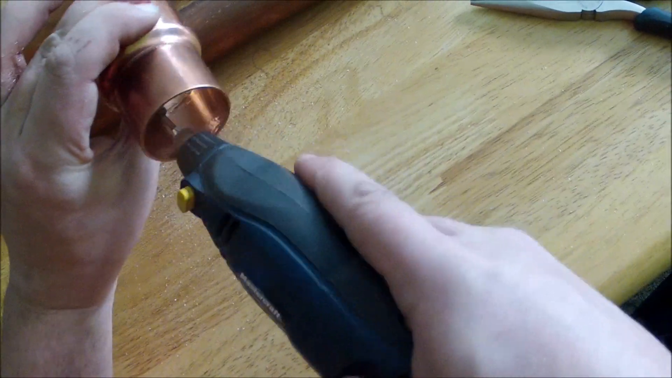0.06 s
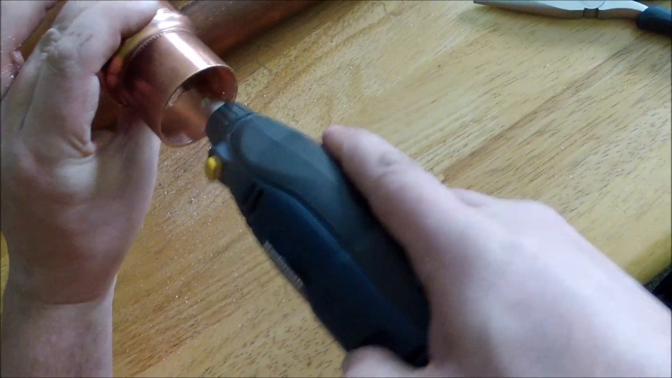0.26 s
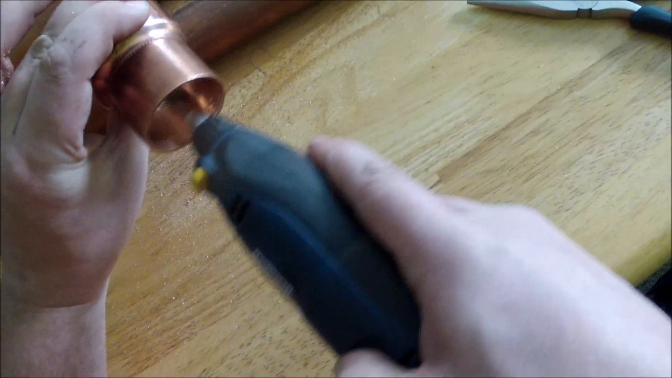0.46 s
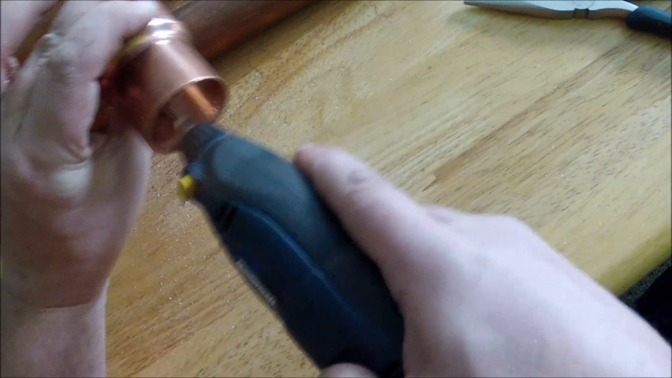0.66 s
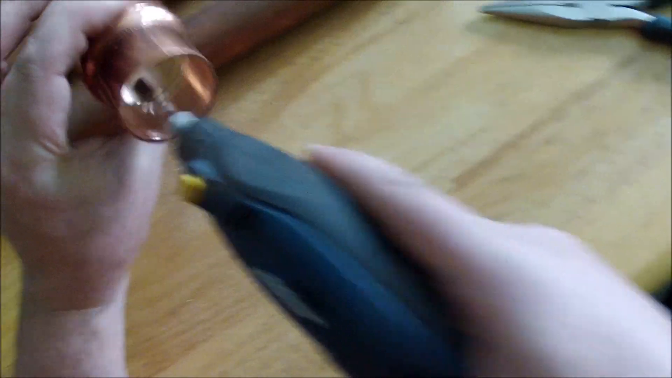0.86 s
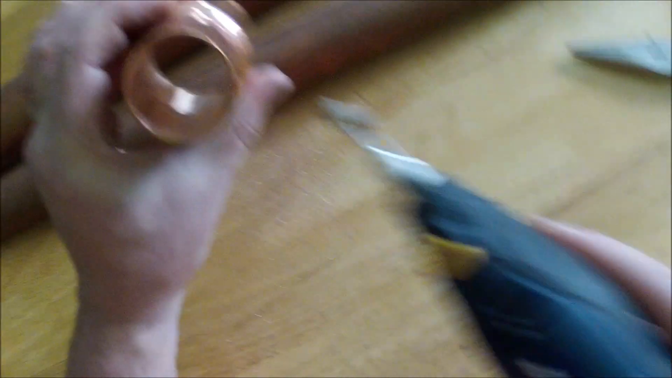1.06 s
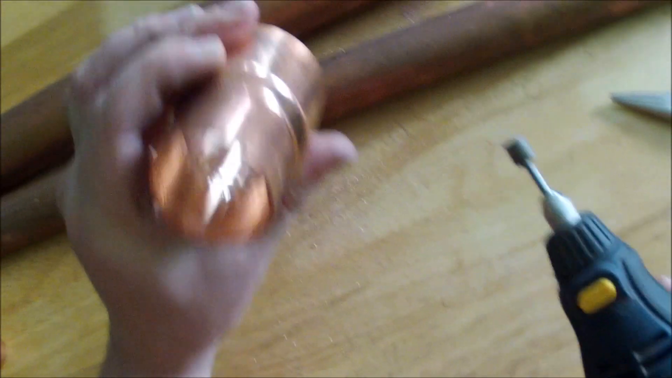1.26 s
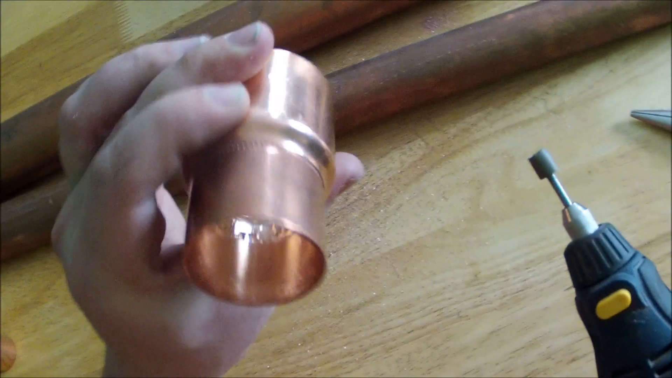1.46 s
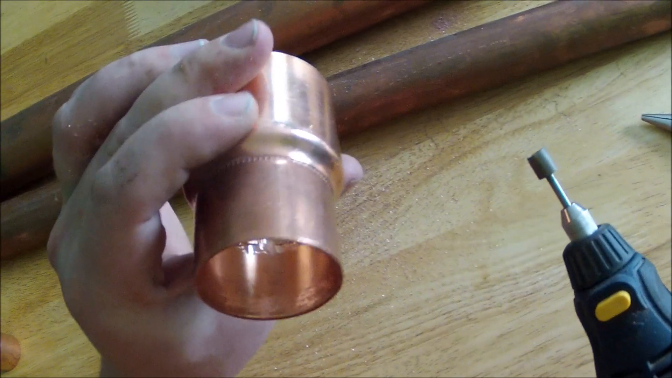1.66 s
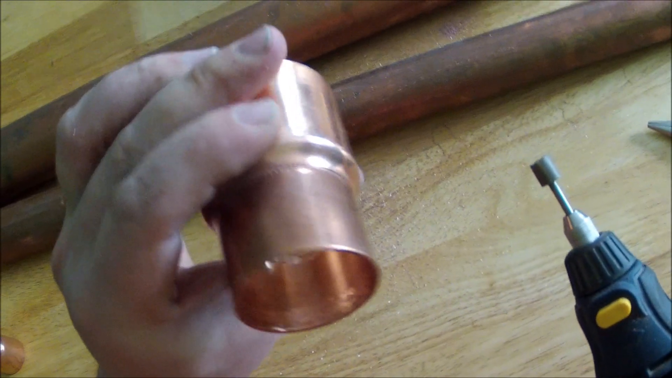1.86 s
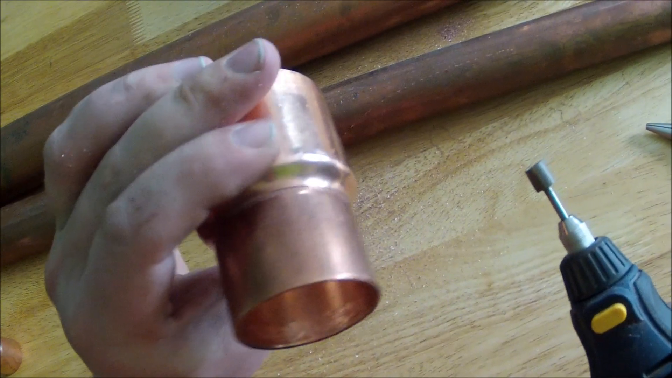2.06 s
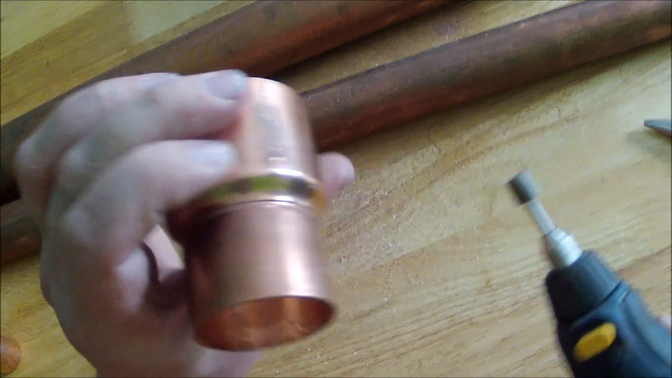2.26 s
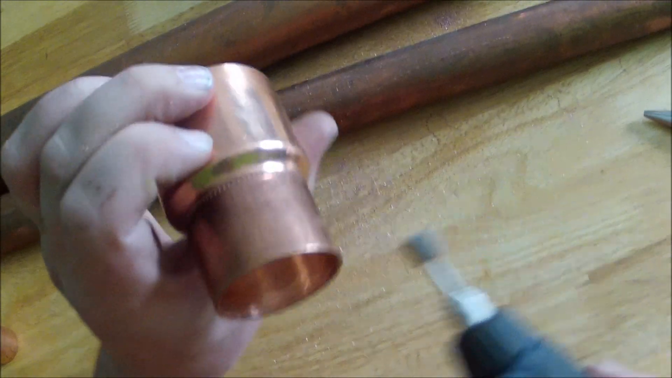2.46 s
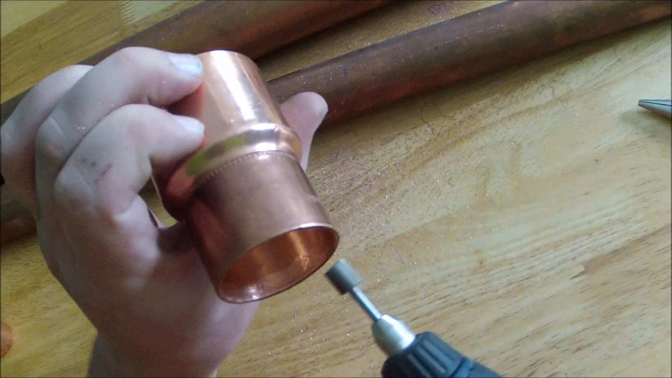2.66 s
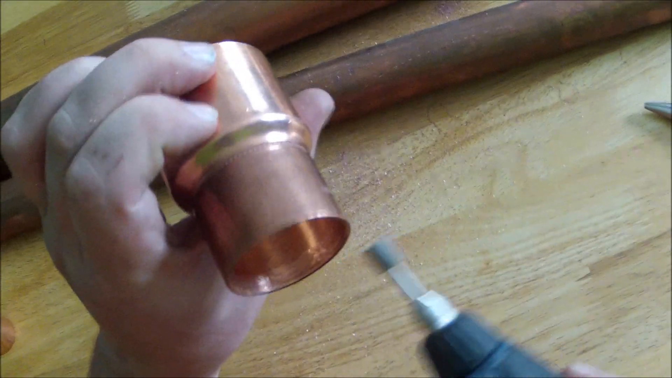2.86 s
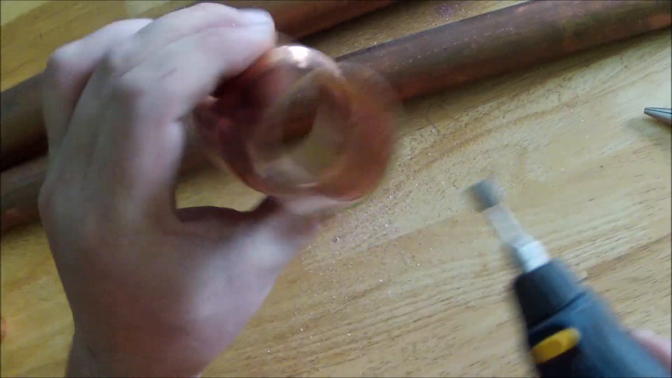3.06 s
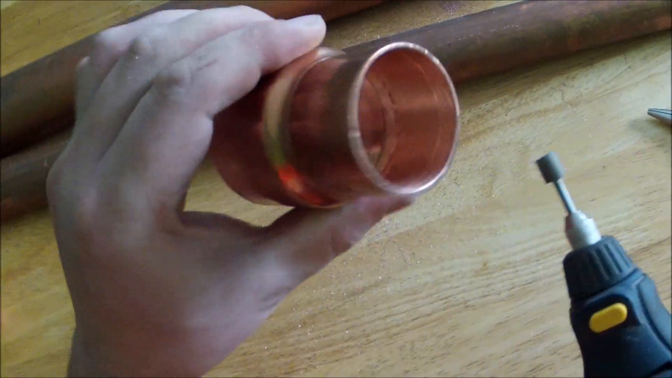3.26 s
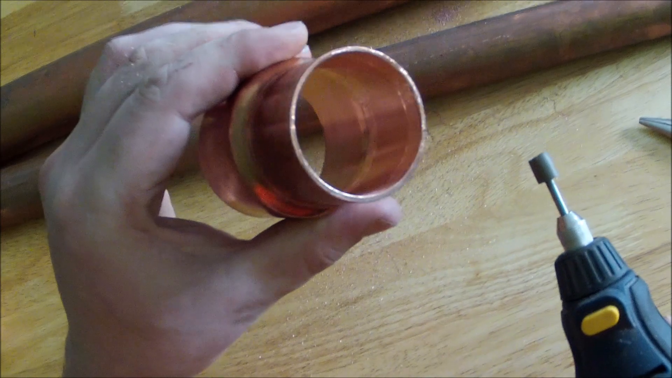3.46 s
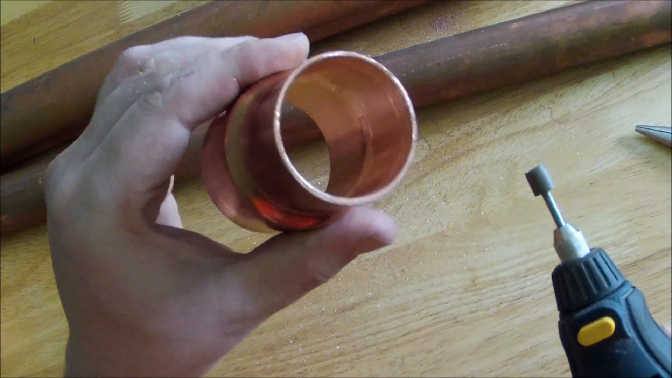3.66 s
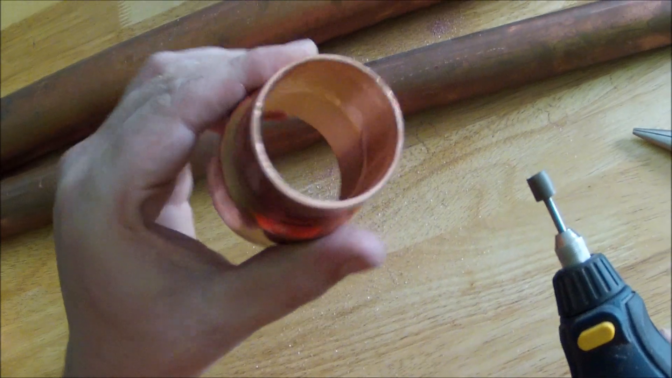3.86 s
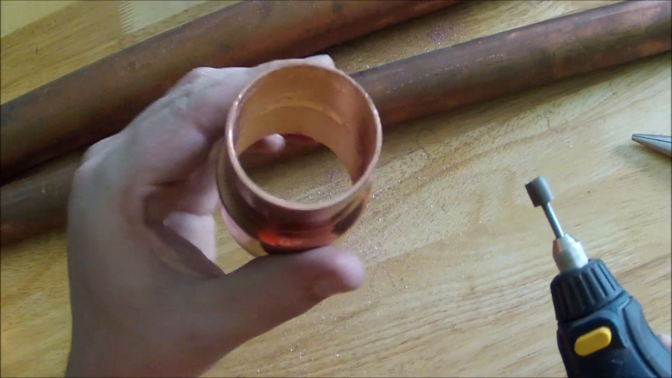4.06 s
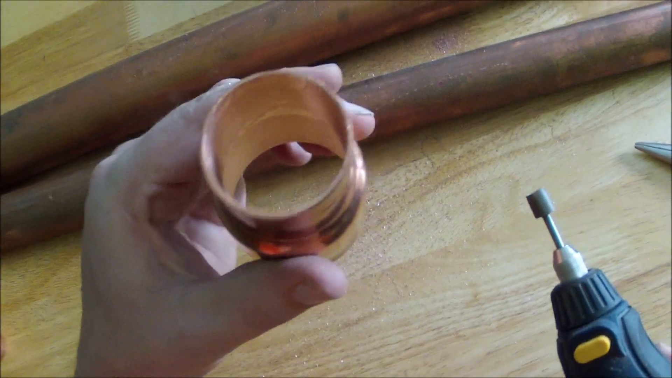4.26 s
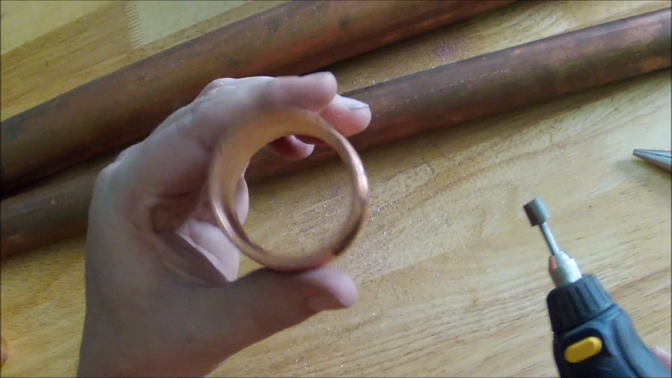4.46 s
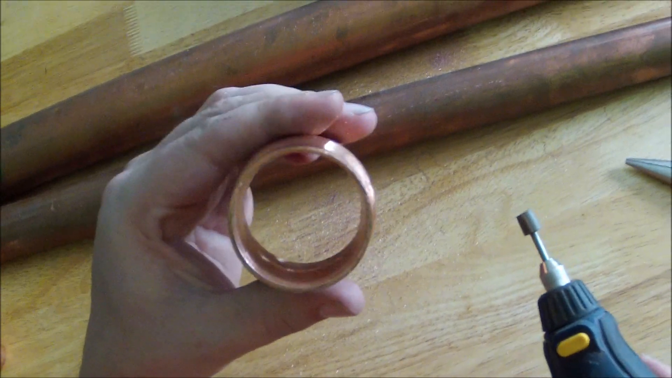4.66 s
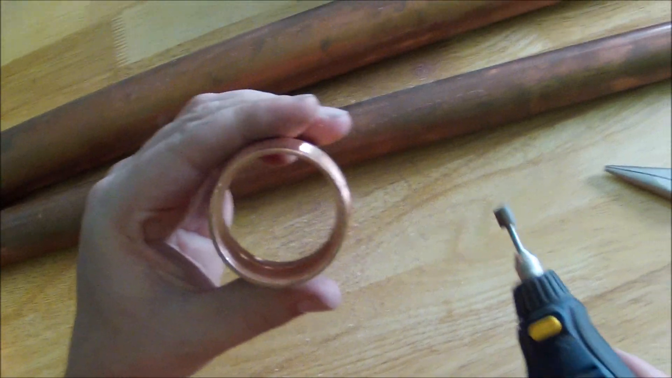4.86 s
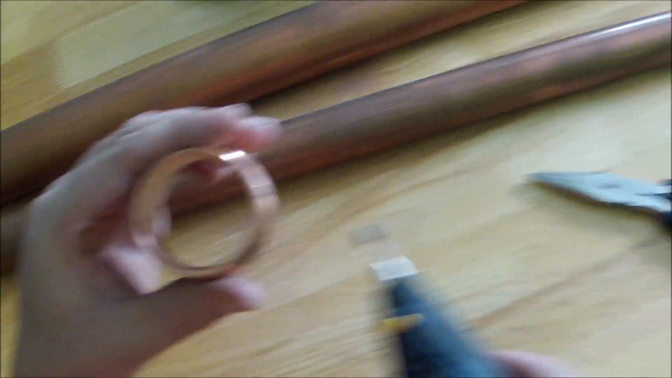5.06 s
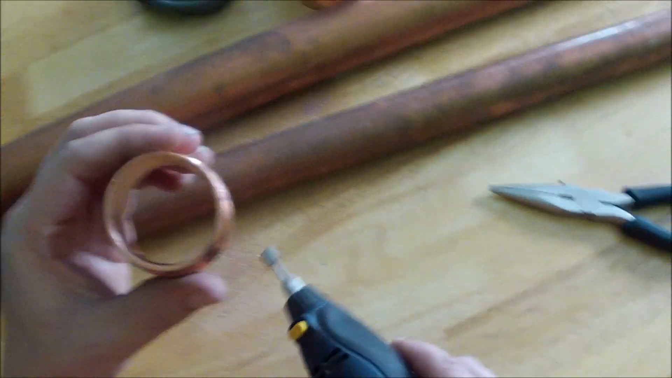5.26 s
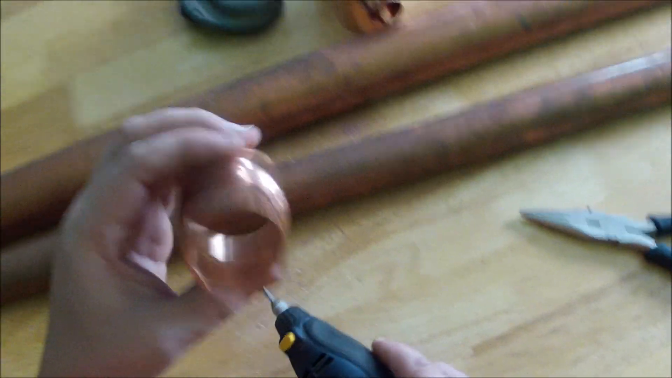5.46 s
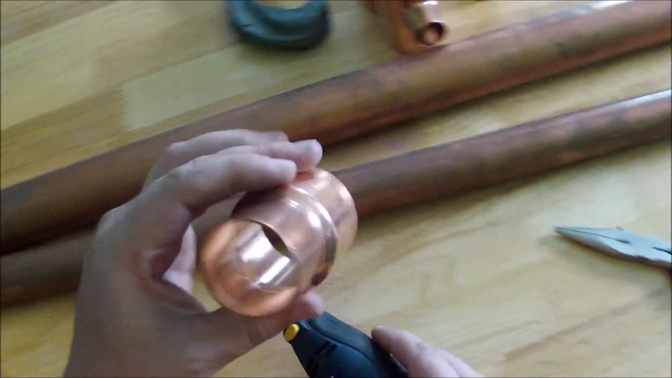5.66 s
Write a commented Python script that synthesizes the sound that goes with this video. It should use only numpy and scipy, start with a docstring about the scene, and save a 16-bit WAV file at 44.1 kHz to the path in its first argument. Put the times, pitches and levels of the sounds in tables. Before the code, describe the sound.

A rough, uneven metallic scrape with a high copper ring and low knocks opens the sound while the motor sags under load. Released, the tool runs up to a buzzing, airy whine that creeps higher. Near the end the power cuts and the tone slides down, fading over faint room noise. Close, low-quality microphone with a gritty digital top.

```python
"""A small mains rotary tool grinds inside a hand-held copper fitting, lifts off, runs up to a free whine,
is switched off and coasts down. The motor is a stack of shaft-speed tones with mains side tones and air noise.
Knocks and grit noise excite copper and bore resonances; hand thumps and room noise are shaped noise bursts
and beds. A close microphone samples slowly and holds each sample, so every tone is mirrored
about the sampling rate."""
import sys
import numpy as np
from scipy import signal
from scipy.fft import rfft, irfft, next_fast_len
from scipy.io import wavfile
from scipy.ndimage import uniform_filter1d

SR = 44100
rng = np.random.default_rng(int(sys.argv[2]) if len(sys.argv) > 2 else 0)


def to_wav(s):
    """Save 16-bit WAV."""
    ch = np.atleast_2d(s).T  # columns
    pcm = np.round(np.clip(ch, -1, 1) * 32767)  # PCM
    wavfile.write(sys.argv[1], SR, pcm.astype(np.int16))


N = 251850
T = np.arange(N) / SR  # time, s
LIFT_S, OFF_S = .8, 4.52  # the stone leaves the copper; the power goes off
PULL_HZ = 120  # torque pulses at twice the mains rate
MUFFLE_DB = -3  # the free-running tones inside the fitting


def motor(turns, shaft_hz):
    """Shaft tones, mains buzz and moving air; while powered the torque pulses at twice the mains rate."""
    air_db, = curves(BREEZE)
    power = np.clip((OFF_S - T) / 0.035, 0, 1)
    pull = power * (np.cos(2 * np.pi * PULL_HZ * T) + 0.11 * np.cos(4 * np.pi * PULL_HZ * T))
    tones = whine(turns, shaft_hz, pull) + rattle(turns, shaft_hz) + commutator(turns, shaft_hz)
    mains = power * (buzz(turns, shaft_hz) + hum())
    hiss = power * brush_hiss(turns, air_db, pull)
    return tones + mains + hiss + cooling_air(turns, air_db, pull)


# Speed dragged down by the stone: t/s, f/Hz (turns a second)
LOADED_SPEED = [(0, 363.5), (.14, 349.8), (.28, 345.7), (.49, 319.5), (.63, 316.5), (.77, 304), (.8, 304)]
# set free, the shaft gains speed quickly, then creeps on
FREE_S, GAIN_HZ, GAIN_S, CREEP_HZ, CREEP_S = .8, 91.46, .4569, 277.1, 23.8
SLACK_S, SLACK_HZ, SLACK_LENGTH_S = 3.12, 1.2, .2  # the climb slackens briefly, then catches up
# coasting from the top speed: bearing friction and air drag
COAST_S, TOP_HZ, FRICTION_HZ_PER_S, DRAG_S = 4.491, 433, 60.9, 3.604


def speed():
    """Turns a second: loaded, running up towards a limit, then slowed by constant friction plus drag."""
    free, off = np.maximum(T - FREE_S, 0), np.maximum(T - COAST_S, 0)
    up = curves(LOADED_SPEED)[0]
    up += GAIN_HZ * (1 - np.exp(-free / GAIN_S)) + CREEP_HZ * (1 - np.exp(-free / CREEP_S))
    up -= SLACK_HZ * np.exp(-((T - SLACK_S) / SLACK_LENGTH_S) ** 2)
    rest = FRICTION_HZ_PER_S * DRAG_S
    coast = (TOP_HZ + rest) * np.exp(-off / DRAG_S) - rest
    return np.minimum(up, coast)


# Housing shaken once a turn: t/s, level/dB
WHINE_LEVEL = [(0, -66), (.05, -66), (.27, -53), (.4, -59), (.69, -52), (.8, -53.5), (.86, -47.5),
               (1.6, -43), (2.4, -37), (3.2, -48), (4, -40), (4.48, -40), (4.53, -36.5), (4.57, -43.5),
               (4.62, -42), (4.9, -52), (5.5, -59), (5.71, -56)]
# Bench and room resonances the whine sweeps through: f/Hz, width/Hz, relative level/dB
BENCH_MODES = [(348.9, 17.4, -6), (371.3, 11.7, -5.5), (391, 6.9, -7.5), (400.8, 7.5, -16),
               (417.86, 4.4, 0), (517, 72.5, 3)]


def whine(turns, shaft_hz, pull):
    """The unbalanced rotor shakes the housing once a turn and excites the bench and room; two overtones."""
    once_a_turn = ring(tone(turns, 0.18 * wander(40)), BENCH_MODES)
    shake = amp(curves(WHINE_LEVEL)[0]) * once_a_turn * (1 + 0.065 * pull)
    shake += tone(2 * turns, order_db(shaft_hz, 2) + 2.1 * wander(22))
    return shake + tone(3 * turns, order_db(shaft_hz, 3) + 1.1 * wander(18))


# Bearing tones: multiples of the shaft speed
RATTLE_ORDERS = (4, 5, 6, 10, 11, 12, 13)


def rattle(turns, shaft_hz):
    """Bearing rattle: shaft multiples whose timing and level waver."""
    return sum(tone(k * turns + 0.036 * wander(16), order_db(shaft_hz, k) + 2.0 * wander(10))
               for k in RATTLE_ORDERS)


BESIDE_OCTAVE_DB = -18  # one turn below and above the octave of the bar tone


def commutator(turns, shaft_hz):
    """Bar tone at 8 per turn and its octave; running out of round adds tones one turn below and above."""
    bars = sum(tone(k * turns, order_db(shaft_hz, k) + 1.6 * wander(25)) for k in (7, 8, 9))
    octave_db = order_db(shaft_hz, 16)
    bars += tone(16 * turns + .03 * wander(30), octave_db + 2.5 * wander(25))
    return bars + sum(tone(k * turns, octave_db + BESIDE_OCTAVE_DB + 2.5 * wander(8)) for k in (15, 17))


# Swells of each shaft multiple: multiple, speed f/Hz, width/Hz, level/dB
ORDER_SWELLS = [(2, 303, 40, -59.5), (2, 345, 40, -62.5), (2, 366, 23, -59.5), (2, 394, 4.6, -62.5),
                (2, 408, 5, -59.5), (2, 419, 14.8, -59.5), (2, 431, 6.5, -74), (3, 367, 30, -67),
                (3, 397, 13, -59), (3, 409, 9.6, -49.5), (3, 428, 22, -58.5), (4, 395, 6.2, -56),
                (4, 407, 13.2, -56), (4, 422, 14, -74.5), (5, 397, 5.5, -54.5), (5, 406, 17.4, -54.5),
                (5, 420, 22, -64.5), (6, 341, 18, -72), (6, 391, 16, -60), (6, 406, 3.8, -56),
                (6, 417, 5.1, -61.5), (6, 430, 10, -71), (7, 392, 8, -62), (7, 408, 11.3, -54.5),
                (7, 418, 6.6, -59.5), (7, 427, 17, -62), (8, 310, 26, -60.5), (8, 348, 52, -60),
                (8, 386, 35, -59), (8, 409, 4.1, -70), (8, 418, 22, -51.5), (8, 426, 4.8, -50.5),
                (8, 431, 7.4, -52.5), (9, 315, 19, -61.5), (9, 360, 16, -60), (9, 391, 7.4, -54),
                (9, 404, 6.5, -49), (9, 415, 5.3, -54.5), (9, 428, 18, -74), (10, 403, 18, -59.5),
                (11, 401, 29, -60), (12, 408, 31, -62), (13, 411, 14, -69), (10, 293, 15, -60.5),
                (11, 408, 1.8, -55), (16, 249, 28, -59.5), (16, 281, 38, -53.5), (16, 314, 28, -58.5),
                (16, 352, 39, -59)]
# Extra swells while the stone presses on the copper: multiple, speed f/Hz, width/Hz, level/dB
PRESSED_SWELLS = [(2, 364, 11, -45), (2, 354.4, 17, -49), (2, 322, 16, -53), (2, 308, 4.5, -47),
                  (5, 352, 16, -51), (6, 328, 10, -43), (6, 308, 8, -51), (7, 311, 8, -43.5),
                  (8, 334, 36, -50)]
# Change of each multiple once the power is off: multiple -> level/dB
COAST_CHANGE = {2: -6, 3: -7, 4: -7.5, 5: -3, 6: 5, 7: 2, 8: -0.5, 9: 1, 10: -1.5, 11: -7, 12: -2, 13: -3,
                16: -2.5}
COAST_FADE_S = .04
COAST_SHIFT_HZ = 8  # coasting, the swells come at a slightly higher speed


def order_db(shaft_hz, k):
    """Level of one shaft multiple in dB, swelling at certain speeds and changed by load and power."""
    pressed = np.clip((LIFT_S + .04 - T) / .06, 0, 1)
    coasting = np.clip((T - OFF_S) / COAST_FADE_S + .5, 0, 1)
    free = swell(shaft_hz - COAST_SHIFT_HZ * coasting, [row[1:] for row in ORDER_SWELLS if row[0] == k])
    extra = swell(shaft_hz, [row[1:] for row in PRESSED_SWELLS if row[0] == k])
    free = free * amp(MUFFLE_DB * pressed + COAST_CHANGE[k] * coasting) ** 2
    return 10 * np.log10(free + pressed * extra + 1e-9)


def swell(shaft_hz, rows):
    """Power of a tone that peaks at the listed speeds."""
    return sum(amp(db) ** 2 / (1 + (2 * (shaft_hz - hz) / width) ** 2) ** 2 for hz, width, db in rows)


# Side-tone pairs around shaft multiples 2 to 12: relative level/dB
BUZZ_PAIRS = [-11, -7.5, -7, -10, -8, 3, 1.5, -3.5, -11, -8.5, -11]
# Mains buzz against shaft speed: speed f/Hz, width/Hz, level/dB
BUZZ_LEVEL = [(382, 30, -73), (408.2, 25, -64), (430, 16, -74)]
# Upper side tone of the bars against shaft speed: speed f/Hz, width/Hz, level/dB
BAR_SIDE_LEVEL = [(332, 30, -60), (379, 53, -57.5), (418, 4.4, -61)]
SECOND_SIDE_DB = -8.5  # two mains pulses above the bar tone


def buzz(turns, shaft_hz):
    """The mains pulse splits shaft multiples into side tones below and above, and adds two above the bars."""
    muffle_db = MUFFLE_DB * (T < LIFT_S)
    pair_db = 10 * np.log10(swell(shaft_hz, BUZZ_LEVEL)) + muffle_db
    side_db = 10 * np.log10(swell(shaft_hz, BAR_SIDE_LEVEL)) + muffle_db
    pairs = sum(tone(k * turns + side * PULL_HZ * T, pair_db + db + 3.1 * wander(5.2))
                for k, db in enumerate(BUZZ_PAIRS, start=2) for side in (-1, 1))
    bar_sides = sum(tone(8 * turns + n * PULL_HZ * T, side_db + db + 2.5 * wander(9))
                    for n, db in ((1, 0), (2, SECOND_SIDE_DB)))
    return pairs + bar_sides


def brush_hiss(turns, air_db, pull):
    """The brushes hiss over the bars in mains pulses: a wide noise band riding near the bar tone."""
    noise = evened(signal.lfilter(*signal.butter(2, 450., fs=SR), rng.standard_normal(N)))
    return (1 + .3 * pull) * noise * tone(8.2 * turns, air_db - 9)


# Cooling air and brush hiss: t/s, level/dB
BREEZE = [(0, -46.5), (.2, -45), (.4, -58), (.6, -44), (.87, -57), (1.1, -55), (1.65, -54.5), (2.1, -50.5),
          (2.45, -51), (2.8, -53.5), (4.6, -53.5), (4.95, -56.5), (5.3, -62), (5.71, -64.5)]
# Air noise spectrum: f/Hz, relative level/dB per Hz
AIR_SPECTRUM = [(88, -70), (150, -37), (231, -23), (371, -11.5), (395, -16), (426, -11.5), (482, -8),
                (788, -20.5), (1180, -14.5), (1270, -13.5), (1530, -20), (3390, -13.5), (4830, -31),
                (5900, -25), (7670, -72), (13000, -120)]


def cooling_air(turns, air_db, pull):
    """Sparking brushes and fan blades chop the air noise at the mains pulse and once a turn."""
    chop = (1 + .11 * pull) * (1 + .3 * np.cos(2 * np.pi * turns))
    return amp(air_db + 0.52 * wander(14)) * colour(chop * rng.standard_normal(N), AIR_SPECTRUM)


# Windings under mains current: f/Hz, level/dB
HUM_TONES = [(120, -89.5), (240, -72.5)]


def hum():
    """The windings hum at fixed multiples of the mains rate."""
    return sum(tone(hz * T, db + 2.0 * wander(3.116)) for hz, db in HUM_TONES)


# Scrape spectrum: f/Hz, relative level/dB per Hz
SCRAPE_SPECTRUM = [(150, -49), (250, -19), (348, -24), (382, -6), (623, 0), (780, -7.5), (1470, -18),
                   (1890, -10), (2310, -32), (2460, 6), (2700, 0), (4970, -12.5), (5900, -35), (7670, -62),
                   (13000, -120)]
# Ring of the fitting: f/Hz, width/Hz, relative level/dB
WALL_MODES = [(2442, 16, 0), (2417, 30, -6)]
# Air and damped wall: f/Hz, width/Hz, relative level/dB
BORE_MODES = [(1820, 340, -2), (1990, 150, -1), (2184, 330, 0.5)]
# Upper modes of the fitting, coming and going as the grip shifts: f/Hz, width/Hz, relative level/dB
SHELL_MODES = [(3293, 36, -15), (3580, 200, -20), (4030, 95, -24)]
# Thin rim: f/Hz, width/Hz, relative level/dB
SCREECH_MODES = [(4680, 130, -4.5), (5020, 120, -2), (5370, 49, -7.5), (5600, 17, -11)]


def grinding(turns):
    """The high spot of the stone knocks once a turn, unevenly; its grit scrapes hardest just after."""
    scrape_db, wall_db, bore_db, screech_db = bite_levels()
    knocks = (np.diff(np.floor(turns), prepend=0) > 0) * amp(2.6 * rng.standard_normal(N))
    chatter = amp(2.1 * wander(80) + .9 * wander(30))
    after_knock = np.exp(-(turns % 1) / 0.62)
    grit = evened((0.53 + after_knock) * rng.standard_normal(N) * chatter)
    chattering_knocks = evened(knocks * chatter)
    drive = 0.37 * chattering_knocks + 1.13 * grit
    # the ringing wall bounces against the stone and partly keeps itself going: a wavering tone
    contact = np.clip((LIFT_S - T) / .04, 0, 1)
    squeal = tone(WALL_MODES[0][0] * T + .13 * contact * wander(40), 1.5 * contact * wander(30))
    wall = .7 * squeal + .7 * contact * ring(evened(knocks) + .7 * grit, WALL_MODES)
    # the low resonances answer mostly to the knocks, so shaft multiples glide through them
    bore = ring(ring(chattering_knocks + .85 * grit, BORE_MODES), BORE_MODES)
    scrape = colour(drive, SCRAPE_SPECTRUM) + loosely(drive, SHELL_MODES)
    screech = loosely(drive, SCREECH_MODES)
    return (amp(scrape_db) * scrape + amp(screech_db) * screech
            + amp(wall_db) * wall + amp(bore_db) * bore)


# Bites of the stone: t/s, length/s, then level/dB of scrape, wall ring, bore resonance, screech
BITES = [(0.053, 0.056, -38.5, -41.5, -37, -52), (0.094, .055, -47, -36.5, -42, -55),
         (0.163, 0.042, -38, -37.5, -39, -44.5), (0.244, 0.063, -43, -37, -44.5, -57),
         (0.353, 0.053, -42.5, -38, -52, -57), (0.42, 0.081, -41, -47, -39.5, -53),
         (0.462, 0.033, -41.5, -34.5, -37, -61), (0.523, 0.088, -53, -59, -46, -52),
         (0.67, 0.07, -39, -39, -34.5, -55), (0.726, 0.048, -44, -31, -39, -54),
         (0.779, 0.033, -46, -38, -54, -58)]
# Rub between bites, in the same layer order: level/dB
RUB_LEVELS = [-46, -44.5, -40.5, -58.5]
# Dying away after the last bite, in the same layer order: fall/dB per s
FALL_RATES = [168, 100, 238, 170]
RELEASE_S = .785


def bite_levels():
    """Level in dB of each grinding layer: a steady rub, the bites, then the fall."""
    s, length, *columns = np.transpose(BITES)
    t = np.minimum(T, RELEASE_S)[:, None]
    shape = np.exp(-(2 * (t - s) / length) ** 2)
    since_release = np.maximum(T - RELEASE_S, 0)
    return [10 * np.log10(amp(rub_db) ** 2 + shape @ amp(db) ** 2) - fall * since_release
            for db, rub_db, fall in zip(columns, RUB_LEVELS, FALL_RATES)]


def loosely(drive, modes):
    """Modes that come and go each on its own."""
    return sum(amp(db + 3.7 * wander(8.1)) * ring(drive, [(hz, width, 0)]) for hz, width, db in modes)


# Thumps through the hands: t/s, level/dB, length/s
THUMPS = [(0.034, -41.5, 0.09), (0.082, -47.5, 0.11), (0.154, -48, 0.14), (0.226, -41, 0.054),
          (0.374, -50, 0.14), (0.455, -54, .04), (0.503, -47, 0.061), (0.539, -42.5, 0.058),
          (0.573, -50, 0.019), (0.671, -59, 0.035), (0.713, -50, 0.088), (0.784, -54.5, 0.071),
          (2.8, -76, 0.87)]
# Thump spectrum: f/Hz, relative level/dB per Hz
THUMP_SPECTRUM = [(12, -33), (20, 0), (129, 1.5), (216, 0.5), (293, 0), (330, -6), (430, -8), (730, -120)]


def hands():
    """Low noise bursts through the hands, plus weaker independent noise of opposite sign in the two channels."""
    bursts = sum(amp(db) * np.cos(np.pi * np.clip((T - s) / length, -.5, .5)) ** 2
                 for s, db, length in THUMPS)
    both = colour(rng.standard_normal(N), THUMP_SPECTRUM)
    opposite = colour(rng.standard_normal(N), THUMP_SPECTRUM)
    return bursts * (both + amp(-14.0) * opposite * np.array([[1], [-1]]))


# Workshop noise spectrum: f/Hz, relative level/dB per Hz
ROOM_SPECTRUM = [(12, -47), (20, -13.5), (179, -15), (232, -15.5), (274, -10), (339, -22.5), (645, -1.5),
                 (859, -36), (1170, -25), (1670, -11), (2120, -3.5), (3500, -11.5), (4760, -3),
                 (5900, -18.5), (7670, -55), (13000, -120)]
ROOM_DB = -57.5


def room():
    """The quiet workshop: steady shaped noise."""
    return amp(ROOM_DB) * colour(rng.standard_normal(N), ROOM_SPECTRUM)


def amp(db):
    """dB to gain."""
    return 10 ** (np.asarray(db) / 20)


def evened(x):
    """Scaled to rms 1."""
    return x / np.sqrt(np.mean(x ** 2) + 1e-20)


def curves(rows):
    """Each column of a table as a value per sample."""
    s, *columns = np.transpose(rows)
    return [np.interp(T, s, c) for c in columns]


def colour(x, points):
    """Shapes x by a spectrum drawn over log frequency, rms 1."""
    f, db = np.transpose(points)
    size = next_fast_len(N)
    hz = np.fft.rfftfreq(size, 1 / SR)
    gain = amp(np.interp(np.log(hz + 1), np.log(f + 1), db))
    return evened(irfft(rfft(x, size) * gain, size)[:N])


def ring(x, modes):
    """Two-pole resonances of equal peak gain times their dB, rms 1."""
    out = 0
    for hz, width, db in modes:
        r = np.exp(-np.pi * width / SR)
        poles = [1, -2 * r * np.cos(2 * np.pi * hz / SR), r * r]
        out = out + amp(db) * (1 - r) * signal.lfilter([1, 0, -r], poles, x)
    return evened(out)


def wander(per_s):
    """Slow chance: smoothed random points, rms 1, joined by lines; a higher rate wavers faster."""
    step = max(int(SR / per_s / 4), 1)
    count = N // step + 2
    points = evened(uniform_filter1d(rng.standard_normal(count), size=3))
    return np.interp(np.arange(N), np.arange(count) * step, points)


def tone(turns, db):
    """A sine of the given rms level that follows a running count of cycles from a random phase."""
    return np.sqrt(2) * amp(db) * np.cos(2 * np.pi * (turns + rng.random()))


def scene():
    """Tool, copper, hands and the quiet workshop, mixed together."""
    shaft_hz = speed()
    turns = np.cumsum(shaft_hz) / SR
    return motor(turns, shaft_hz) + grinding(turns) + hands() + room()


EDGE_HZ = 15310  # upper band limit


def record(dry):
    """Sampled 12000 times a second and held, which mirrors the spectrum; then the band limit."""
    slow = signal.resample_poly(dry, 40, 147, axis=1, window=("kaiser", 8))
    held = np.repeat(slow, 4, axis=1)  # 48000 a second
    held = signal.resample_poly(held, 147, 160, axis=1)[:, :N]
    band = signal.firwin(1501, EDGE_HZ, window=("kaiser", 8), fs=SR)
    return signal.oaconvolve(held, band[None], "same")


dry = scene()
out = record(dry)
to_wav(out)
```